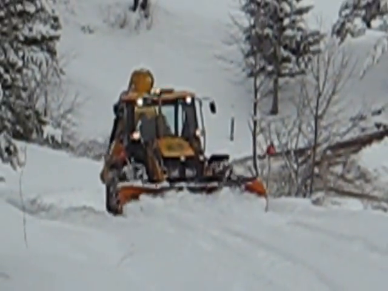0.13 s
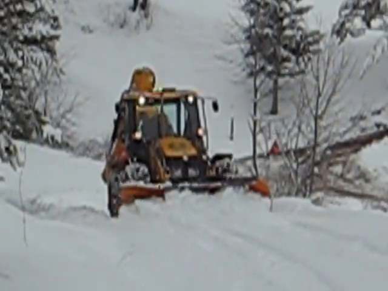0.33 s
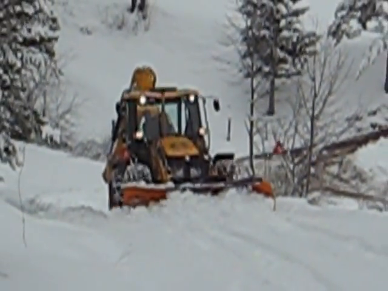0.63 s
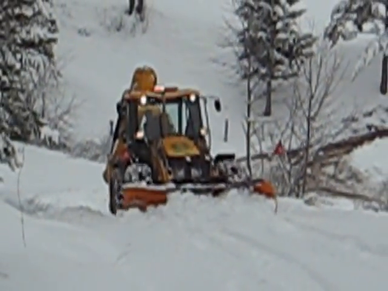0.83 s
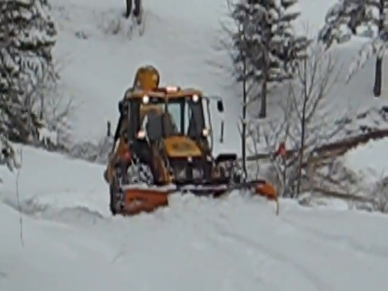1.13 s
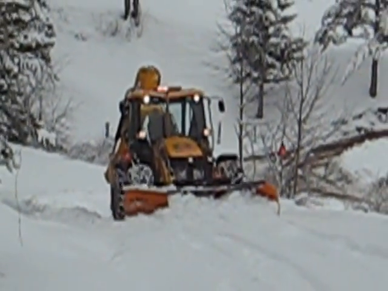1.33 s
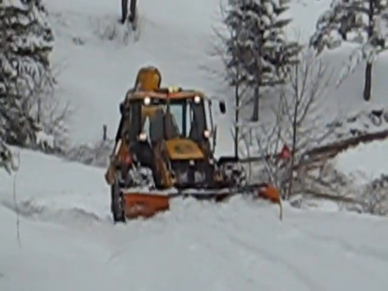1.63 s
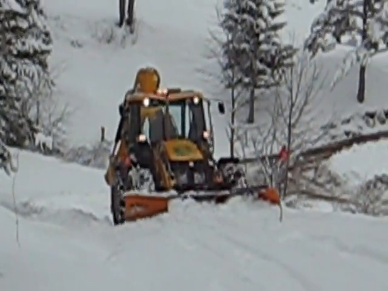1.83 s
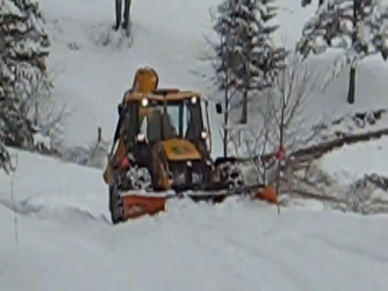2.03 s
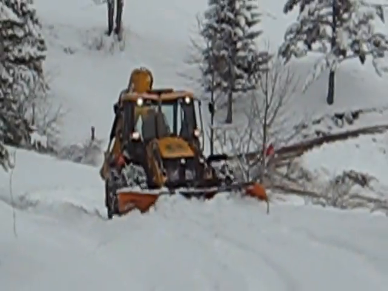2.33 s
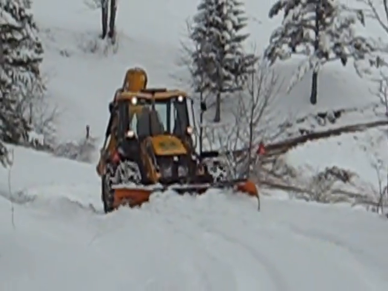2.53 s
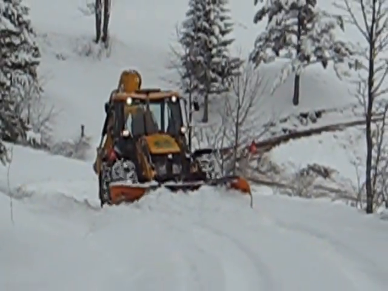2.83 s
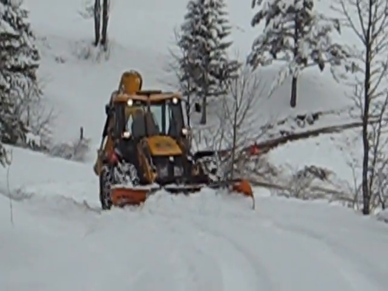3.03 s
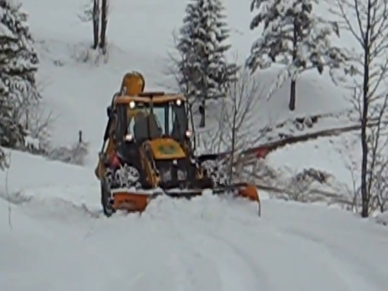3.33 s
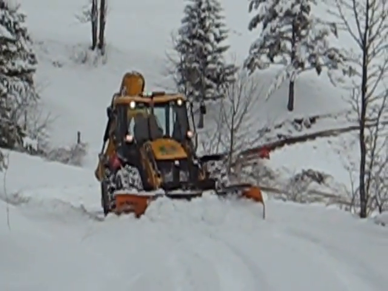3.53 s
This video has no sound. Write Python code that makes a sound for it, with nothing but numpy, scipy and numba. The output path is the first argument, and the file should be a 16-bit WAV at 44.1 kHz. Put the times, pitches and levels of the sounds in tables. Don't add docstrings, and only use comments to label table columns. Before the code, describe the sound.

Steady rough diesel roar from a snow-pushing loader on an open slope; its pitch barely rises, dips briefly late, then recovers. Distant, midrange-heavy, dull-topped low-grade camera sound with slight level pumping.

```python
import sys
import numpy as np
from scipy import signal
from scipy.io import wavfile
from scipy.ndimage import uniform_filter1d
from numba import njit

SR = 44100
rng = np.random.default_rng(int(sys.argv[2]) if len(sys.argv) > 2 else 0)


def boost(x):
    u = np.asarray(x, float) / 20
    return 10 ** u


def bounce(signal):
    frames = np.transpose(np.atleast_2d(signal))
    limited = np.clip(frames, -1, 1)
    pcm = np.round(limited * 32767).astype(np.int16)
    wavfile.write(sys.argv[1], SR, pcm)


N = 162288
T = np.arange(N) / SR

# [t/s, third firing order f/Hz, level/dB]
ENGINE = [(0, 220.3, -1.5), (.5, 220.4, -0.5), (1.0, 222, 0.5), (1.5, 223.5, 0.5), (1.75, 223.8, 1),
          (2.1, 224.1, 1.5), (2.38, 224.8, 1), (2.58, 219.3, 0), (2.72, 219.3, 2.5), (2.95, 223, 2),
          (3.1, 224.6, 0), (3.5, 225.6, 1.5), (3.68, 225.4, 1)]
# [multiple of firing rate, level/dB, waver/dB, growth/(dB/s)]
EXHAUST_ORDERS = [(1, -47, 0, 0.8), (2, -40.5, 0.5, 2), (2.5, -58.5, 5.5, 1.5), (3, -34.5, -0.5, 1),
                  (3.5, -55.5, 0.5, 3.5), (3.75, -50, 6, 1), (4, -40, 2, 0), (4.5, -47, 3, 2.5),
                  (5, -30, 3.5, 0.58), (6, -35.5, 3.5, 1), (7, -49, 2.5, 3), (7.5, -40.5, 4.5, -0.5),
                  (7.75, -42.5, 5, -3), (8.5, -43, 3, 0), (10.5, -41, 4, -1.5), (12.5, -45.5, 3.5, -2.5),
                  (8, -43.5, 2.5, 2), (10, -39, 4, 0.5)]
# [f/Hz, width/Hz, level/dB, growth/(dB/s)]
HOOD_MODES = [(219, 150, -15, 1.5), (377, 98, -0.5, -0.5), (446.5, 59, -3, 0.5), (568.3, 34, 4.5, 0.35),
              (622, 37, 0.5, 0), (698, 130, -8.5, -1), (837, 150, -10.5, 1), (761.3, 38, -1.5, -3),
              (929, 41, -2.5, -5.5)]
CYLINDER_DB = (0, -2.5, -1, -4.5)
# [f/Hz, level/dB per Hz]
BLOCK_SPECTRUM = [(700, -10.5), (1000, 3.5), (1300, -2), (2000, -2), (2900, -2), (4000, -10), (5000, -11),
                  (5600, -11)]
# [f/Hz, width/Hz, level over rattle/dB]
BLOCK_RINGS = [(1310, 180, 7), (2355, 270, 2), (3870, 150, 2), (2930, 140, 1.5), (1133, 40, 4.5),
               (1363, 57, 2.5)]
# [t/s, peak level/dB, f/Hz]
THUMPS = [(0.033, -4, 587), (0.119, -7, 735), (0.166, -13, 670), (0.471, -5, 559), (0.634, -13.5, 367),
          (0.689, -11, 783), (0.744, -7, 747), (0.774, -12.5, 726), (0.851, -11, 752), (0.905, -13, 543),
          (0.955, -7.5, 565), (1.121, -6.5, 817), (1.552, -14, 700), (1.606, -25.5, 368),
          (2.058, -6.5, 560), (2.221, -9, 377), (2.283, -8.5, 620), (2.382, -15.5, 383),
          (2.461, -19.5, 414), (2.575, -10.5, 573), (2.626, -16, 518), (2.842, -9.5, 580),
          (2.873, -10, 366), (3.005, -10, 714), (3.093, -11.5, 570), (3.26, -17, 592), (3.303, -14.5, 606),
          (3.461, -12.5, 378)]
# [deepest t/s, duration/s, f/Hz, glide/(Hz/s)]
DIPS = [(.1, .45, 1280, -200), (2.1, 1.1, 1050, -50), (.3, .5, 2350, -350), (1.45, .55, 2010, -150),
        (2.7, .6, 1700, -280), (3.5, .4, 2030, 80), (.6, .7, 3820, 60), (.6, .6, 3380, -120),
        (2.35, .5, 3370, -450), (3.3, .45, 3070, -200), (2.0, .5, 2680, -200), (2.3, .5, 4430, -250),
        (1.1, .35, 4900, -300), (1.2, .25, 3080, -200), (3.4, .35, 830, 0), (1.6, .15, 540, 0)]
DIP_DB = (-11, -8, -6.5, -11.5, -6.5, -9, -5, -3, -8, -4, -3, -8, -2.5, -5, -1.5, -1)
# [strongest t/s, duration/s, f/Hz,
# glide/(Hz/s)]
SWELLS = [(1.7, .65, 4110, -280), (3.15, .55, 2560, -380), (2.8, .45, 5100, -100), (2.4, .75, 2860, -40),
          (3.6, .25, 2350, -200), (1.3, .3, 3550, -50), (1.9, .3, 5000, 0), (.4, .7, 1780, -60),
          (.3, .5, 4550, -100), (.4, .9, 2940, -50), (3.2, .4, 570, 0), (.2, .4, 570, 0), (.75, .5, 770, 0),
          (.9, .45, 950, 0), (.95, .1, 565, 0), (2.4, .25, 1330, -100), (3.1, .3, 1300, 0),
          (3.3, .4, 3950, 0)]
SWELL_DB = (7.4, 4.7, 2.5, 4.2, 2.7, 5, 2.4, 5.5, 3, 4.5, 2.7, 3.8, 3, 2.1, 2.6, 2.4, 3, 3.4)
# [t/s, depth/dB]
DUCKS = [
    (.1, 0),
    (0.758, 1.5),
    (1.09, 1.5),
    (1.523, 1.5),
    (2.035, 2.5),
    (2.253, 1.5),
    (2.638, 10.5),
    (3.118, 1),
    (3.397, 3),
    (3.558, 4.5),
]


def svf(x, hz, width_hz):
    return signal.lfilter(*signal.iirpeak(hz, hz / width_hz, fs=SR), x)


def svf_twice(x, hz, width_hz):
    return svf(svf(x, hz, width_hz), hz, width_hz)


def level(x, db):
    return x * boost(db) / np.sqrt(np.mean(x ** 2))


def curve(table, axis):
    columns = np.array(table)
    return np.interp(T, columns[:, 0], columns[:, axis])


def walk(rate_hz):
    hold = int(SR / rate_hz)
    steps = np.repeat(rng.standard_normal(N // hold + 1), hold)
    return 1.3 * uniform_filter1d(uniform_filter1d(steps, hold), hold)[:N]


def smooth(x, taps):
    return np.convolve(np.pad(x, len(taps) // 2, mode="reflect"), taps, "valid")


def rumble():
    snow = boost(2.0 * walk(3.5)) * svf_twice(rng.standard_normal(N), hz=178, width_hz=160)
    tyres = svf(rng.standard_normal(N), hz=39, width_hz=45)
    return level(snow, -47) + level(tyres, -58.5)


@njit
def glide(x, hz, width_hz):
    y, band, low = np.empty(len(x)), 0., 0.
    for i in range(len(x)):
        g, damping = np.tan(np.pi * hz[i] / SR), width_hz / hz[i]
        v = (band + g * (x[i] - low)) / (1 + g * (g + damping))
        band, low, y[i] = 2 * v - band, low + 2 * g * v, damping * v
    return y


def over_snow(x):
    for (s, lasts_s, hz, slide), db in zip(DIPS + SWELLS, DIP_DB + SWELL_DB):
        centre_hz = np.clip(hz + slide * (T - s), 200, 8000)
        depth_db = db * np.exp(-((T - s) / lasts_s) ** 2)
        x = x + (boost(depth_db) - 1) * glide(x, centre_hz, 165.)
    return x


def firings(phase):
    k = phase.astype(int)
    scatter_db = 2 * rng.standard_normal(N // 400)
    return boost(np.array(CYLINDER_DB)[k % 4] + scatter_db[k])


def throb(phase, depth):
    return 1 + depth * (firings(phase) * (1 - np.cos(2 * np.pi * phase)) - 1)


def cranked(phase):
    memory, repeat_share = 0.75, 0.3
    fresh = rng.standard_normal((200, 1200))
    pattern = signal.lfilter([np.sqrt(1 - memory ** 2)], [1, -memory], fresh, axis=0)[40:]
    crank = phase / 2
    again = pattern[crank.astype(int), (crank % 1 * 1200).astype(int)]
    return np.sqrt(repeat_share) * again + np.sqrt(1 - repeat_share) * rng.standard_normal(N)


def clatter(phase):
    out, swell = 0, walk(9)
    block_hz, block_db = np.transpose(BLOCK_SPECTRUM)
    for hz in 800 * 2 ** (np.arange(12) / 4):
        db = np.interp(np.log(hz), np.log(block_hz), block_db) + 10 * np.log10(hz)
        waver_db = 0.47 * walk(25) + 0.28 * swell + 0.55 * walk(16)
        noise = cranked(phase) if hz < 1500 else rng.standard_normal(N)
        out = out + boost(db + waver_db) * svf_twice(noise, hz, hz / 3)
    out = out * throb(phase, 0.14)
    rings = sum((boost(db) - 1) * svf(out, hz, width_hz) for hz, width_hz, db in BLOCK_RINGS)
    return level(out + rings, -26)


def thumps():
    out, t = np.zeros(N + 2000), np.arange(2000) / SR
    decay = np.pi * 160 * t
    envelope = np.e * decay * np.exp(-decay)
    for s, db, hz in THUMPS:
        start = int(s * SR)
        out[start:start + len(t)] += boost(db - 5) * envelope * np.sin(2 * np.pi * hz * t)
    return out[:N]


def lulls():
    lull_db, lull_s = -4, 0.0082
    return boost(sum(lull_db * np.exp(-((T - s + lull_s) / lull_s) ** 2) for s, _, _ in THUMPS))


def roar(phase):
    knock_share = 0.086
    knocks = firings(phase) * (np.diff(np.floor(phase), prepend=0) > 0)
    noise = throb(phase, 0.28) * boost(0.74 * walk(60)) * cranked(phase)
    drive = knock_share * level(knocks, 0) + (1 - knock_share) * noise
    ring = 0
    for k, (hz, width_hz, db, grow_db) in enumerate(HOOD_MODES):
        gain = boost(db + grow_db * (T - 1.5) + 0.46 * walk(21))
        ring = ring + (-1) ** k * gain * svf_twice(drive, hz, 1.2 * width_hz)
    gas = throb(phase, 0.54) * cranked(phase)
    body = svf_twice(gas, hz=640, width_hz=600)
    return level(ring, -26) + level(body, -26.5)


def exhaust(phase):
    out = 0
    for order, db, waver_db, grow_db in EXHAUST_ORDERS:
        gain = np.sqrt(2) * boost(db + grow_db * (T - 1) + waver_db * walk(15))
        out = out + gain * np.cos(2 * np.pi * order * phase + 0.1 * waver_db * walk(10))
    return out


def scene():
    firing_hz = curve(ENGINE, axis=1) / 3 * (1 + 0.001 * walk(8))
    phase = np.cumsum(firing_hz) / SR
    load = boost(curve(ENGINE, axis=2))
    machine = over_snow(lulls() * roar(phase) + clatter(phase))
    return (rumble() + thumps() + load * machine + exhaust(phase))[None]


def duck_gain():
    hold_s, recover_db_per_s = 0.036, 29.5
    total_db = 0
    for s, db in DUCKS:
        attack = np.clip((T - s) / 0.00088, 0, 1)
        recovered_db = recover_db_per_s * np.maximum(T - s - hold_s, 0)
        total_db = total_db + attack * np.clip(db - recovered_db, 0, None)
    return boost(-total_db)


def eight_bit(x):
    bit = 1 / 128
    held = np.zeros(N)
    held[::4] = 4 * bit * np.round(x[::4] / bit)
    return smooth(held, signal.firwin(65, SR / 8, window=("kaiser", 9), fs=SR))


def band_limit(x):
    return signal.sosfilt(signal.butter(12, 7100, fs=SR, output="sos"), x)


def record(dry):
    clipped = np.tanh(1.8 * dry[0] * duck_gain()) / 1.8
    limited = smooth(clipped, signal.firwin(81, 5700, fs=SR)) - 0.0105
    return band_limit(eight_bit(limited)[None])


dry = scene()
out = record(dry)
bounce(out)
```